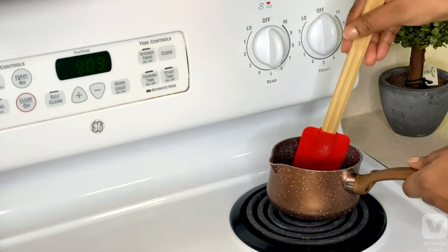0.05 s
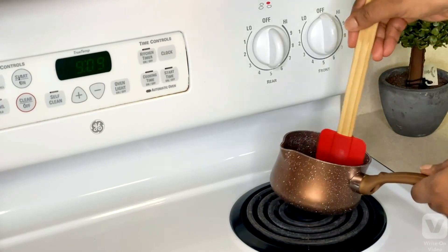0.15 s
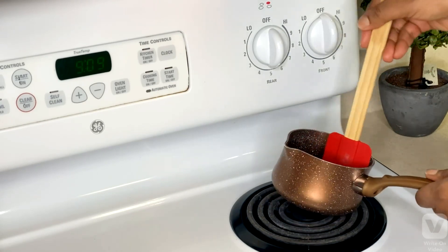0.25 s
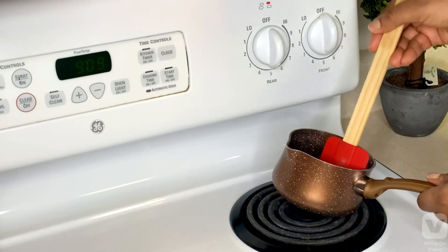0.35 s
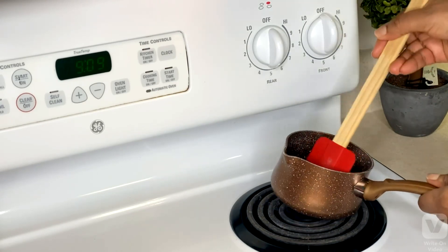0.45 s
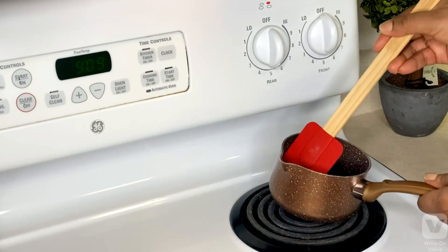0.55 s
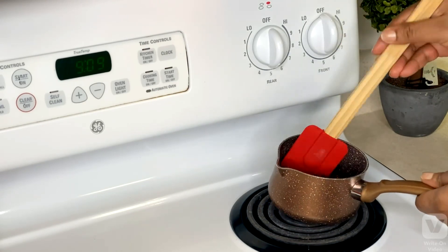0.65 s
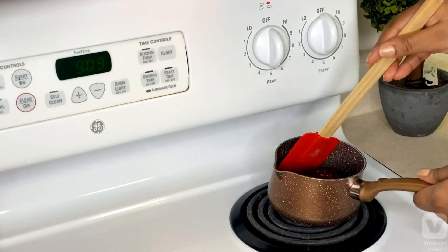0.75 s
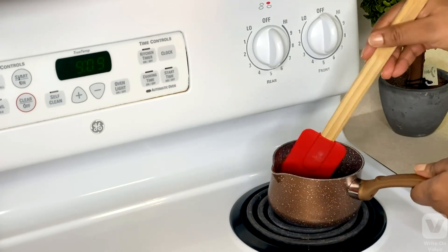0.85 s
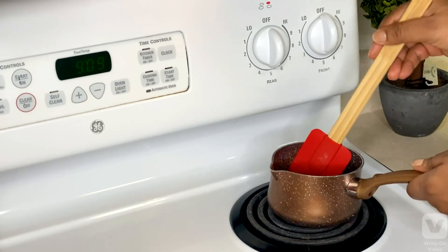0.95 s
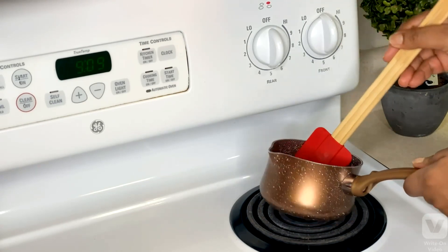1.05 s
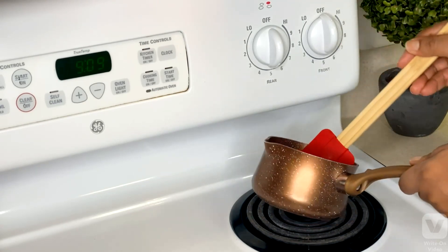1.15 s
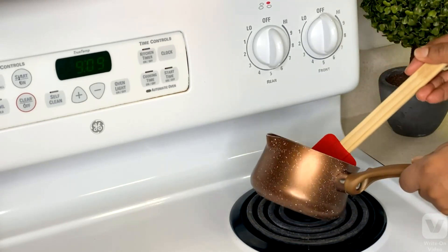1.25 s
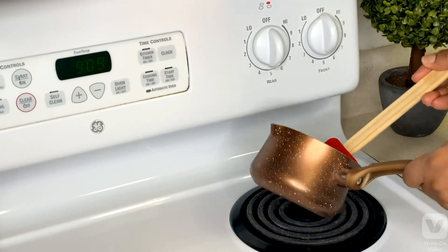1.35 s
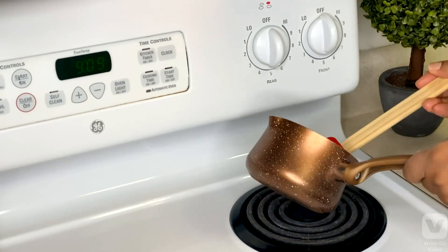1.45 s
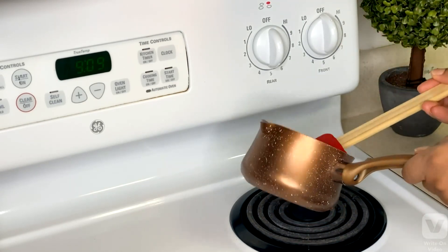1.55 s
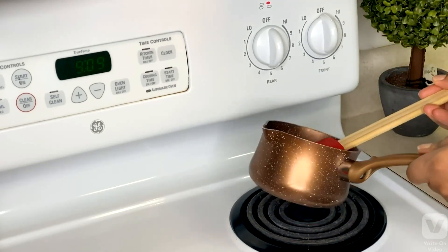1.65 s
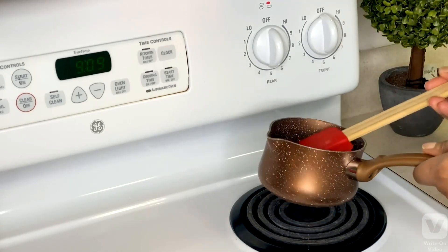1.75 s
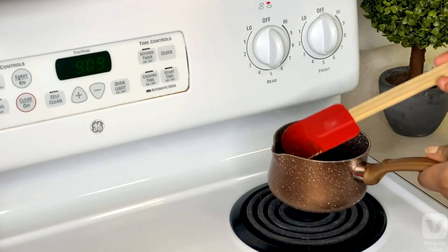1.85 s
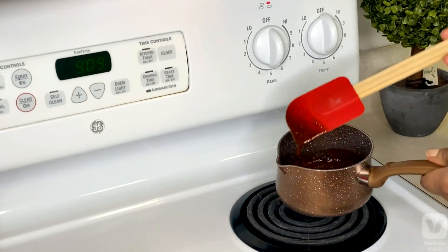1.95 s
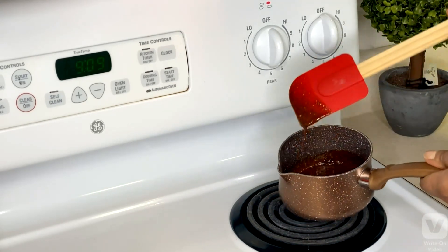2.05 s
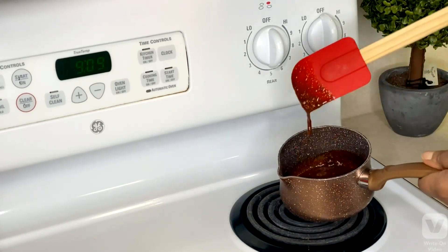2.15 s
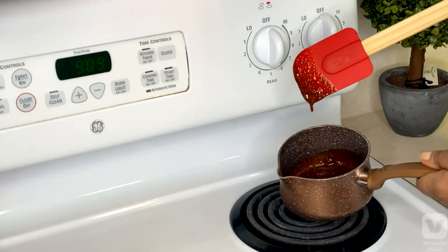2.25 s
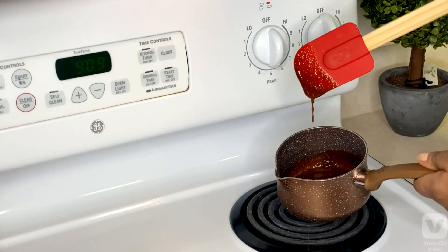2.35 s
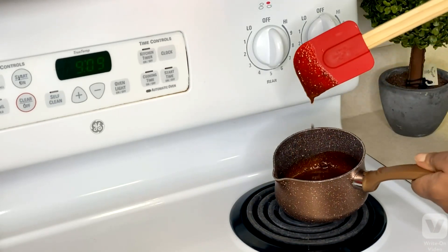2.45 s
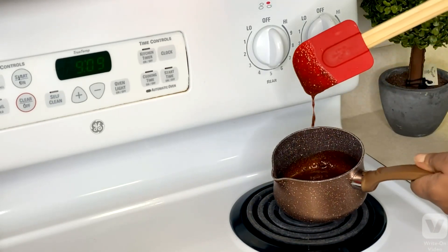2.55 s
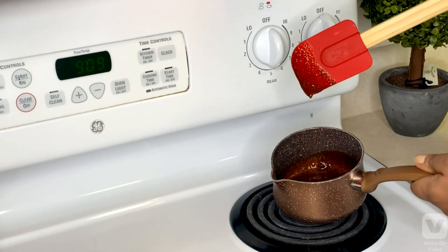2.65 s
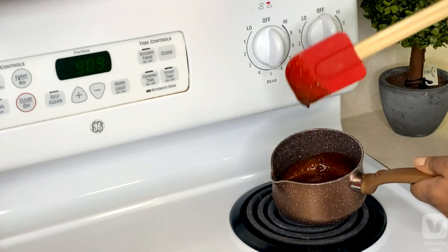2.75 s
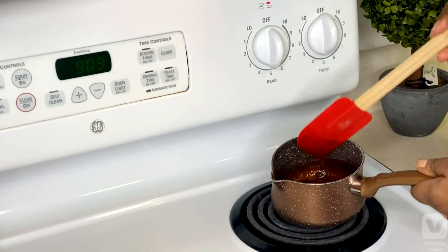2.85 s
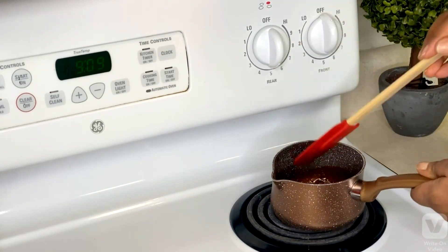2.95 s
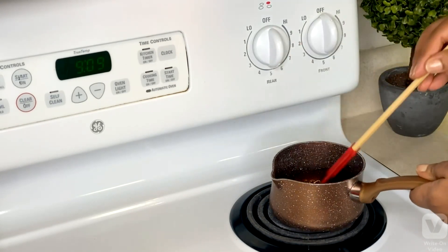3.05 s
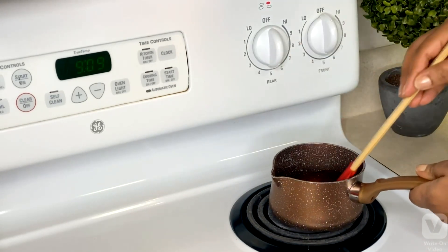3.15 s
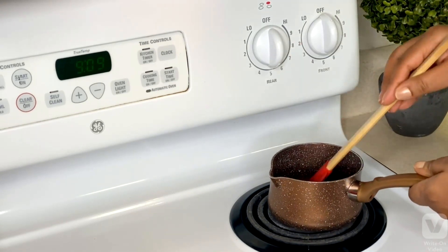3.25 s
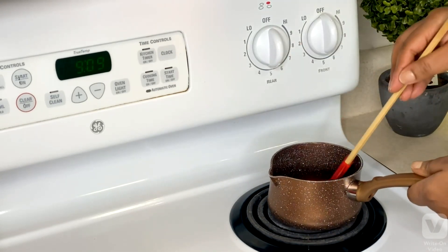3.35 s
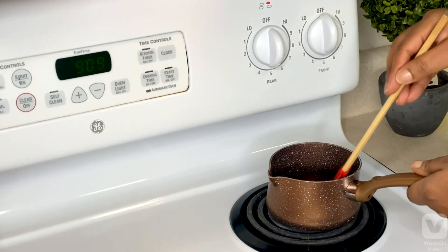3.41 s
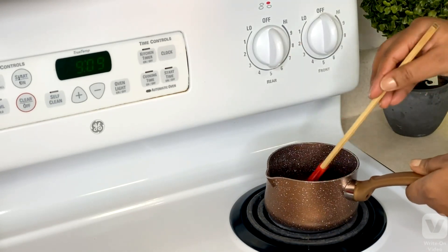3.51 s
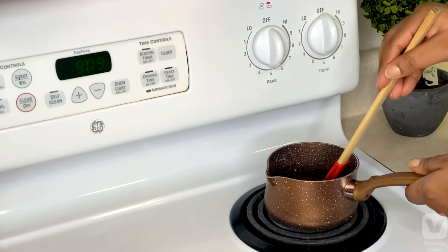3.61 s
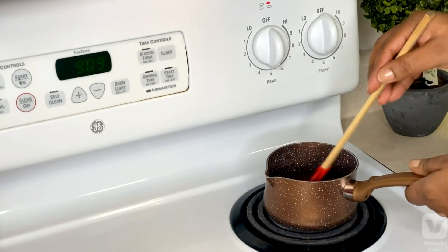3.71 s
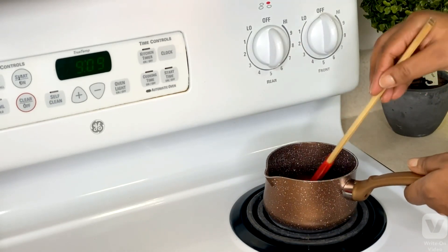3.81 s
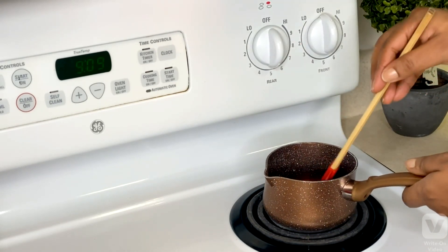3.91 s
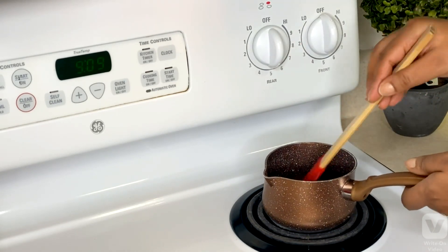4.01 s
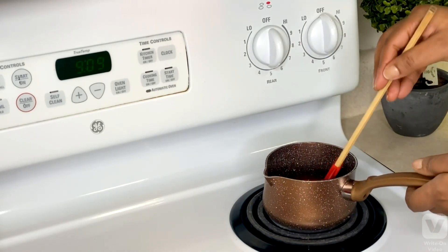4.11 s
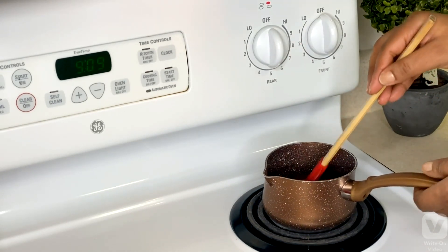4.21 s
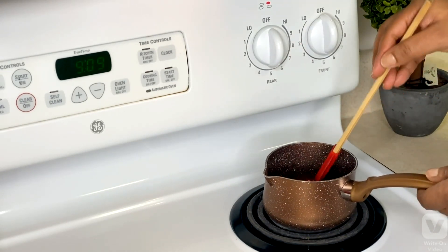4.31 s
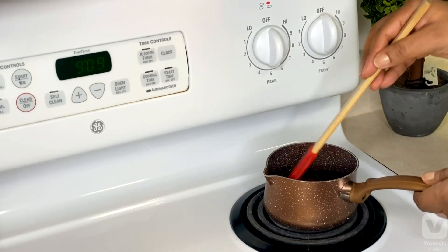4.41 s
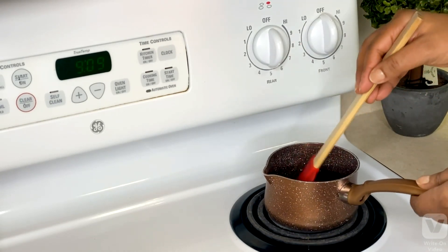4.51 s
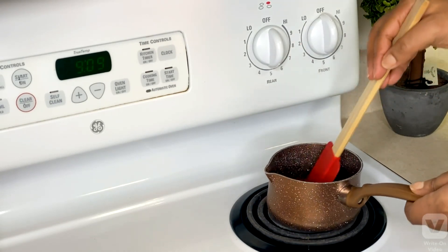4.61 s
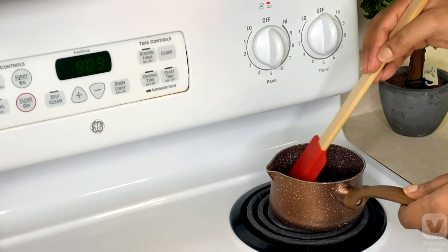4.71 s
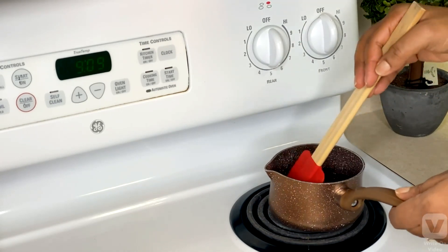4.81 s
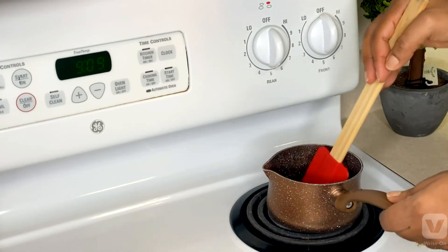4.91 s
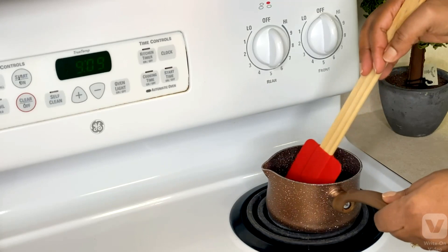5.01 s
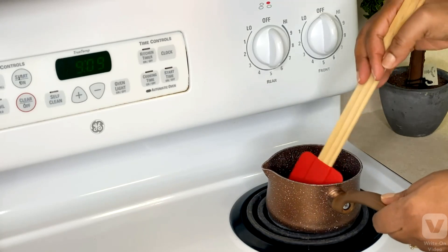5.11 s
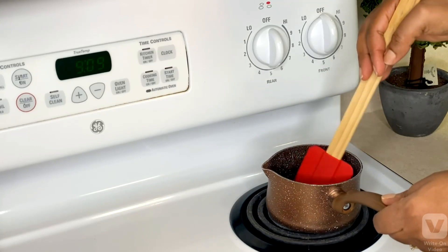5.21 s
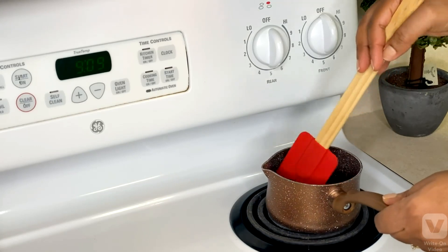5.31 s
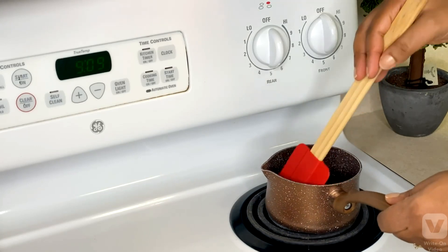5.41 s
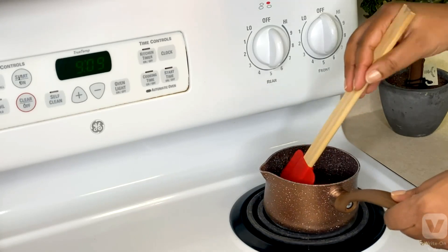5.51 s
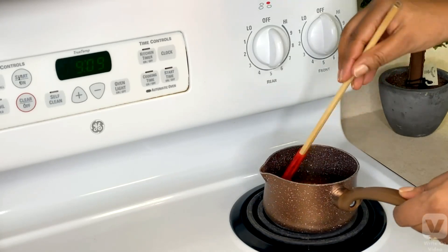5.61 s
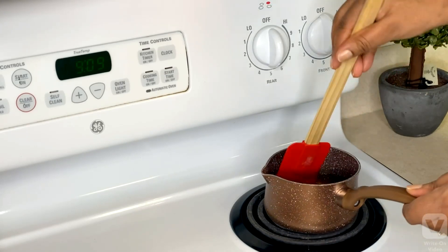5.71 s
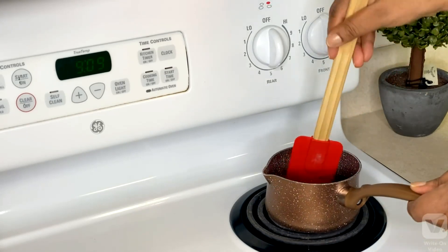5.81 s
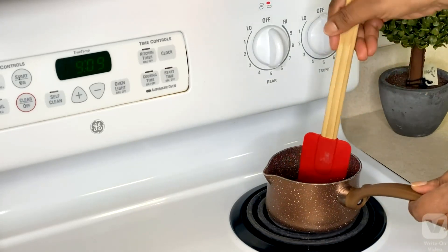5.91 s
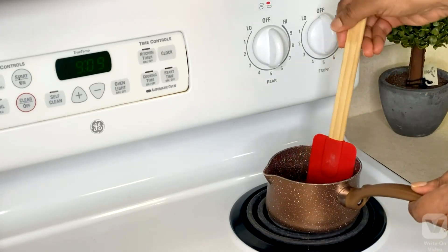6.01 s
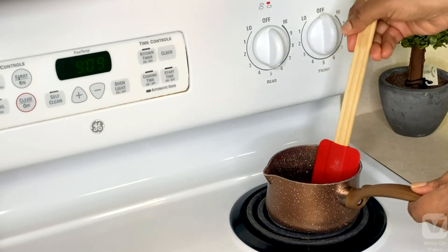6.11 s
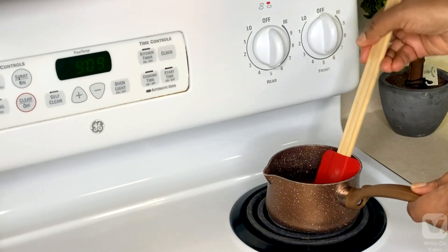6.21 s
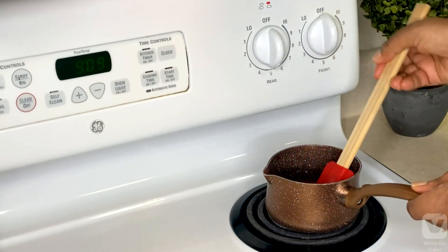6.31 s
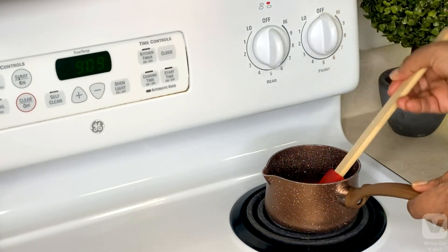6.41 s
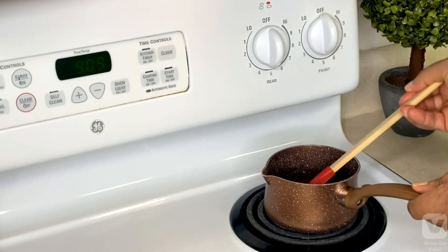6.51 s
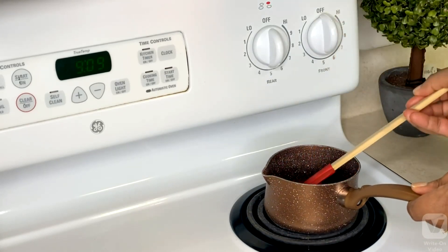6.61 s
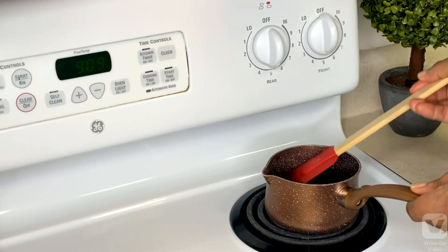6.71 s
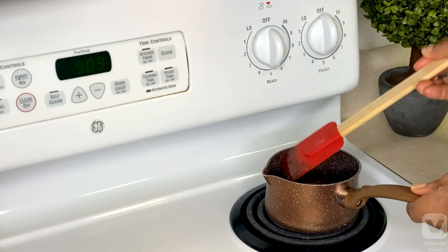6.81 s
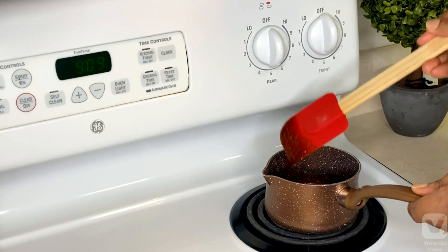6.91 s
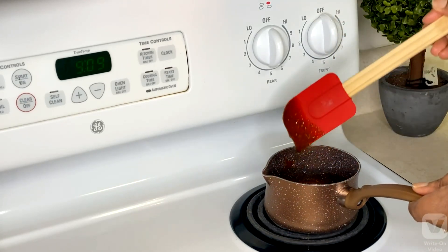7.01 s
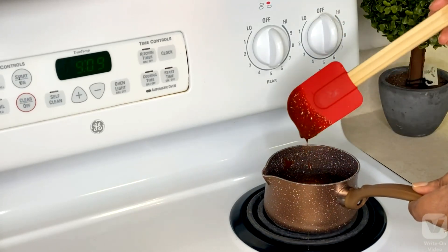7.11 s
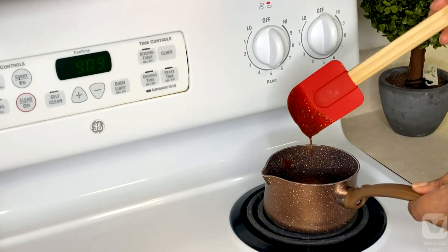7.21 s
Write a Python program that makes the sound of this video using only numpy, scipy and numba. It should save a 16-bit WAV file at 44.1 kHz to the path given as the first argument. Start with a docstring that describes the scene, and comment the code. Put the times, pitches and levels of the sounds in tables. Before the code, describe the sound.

A silicone spatula rubs through thick sauce in a small nonstick pan, making soft, gritty, wet strokes with a faint fizz and tiny snaps. The pan thuds once, low, against the burner. After a lull with faint drips, the stirring returns louder, with knocks on the pan wall, dull squelches and slight squeaks, then eases off. It sounds close, in a quiet kitchen with a low appliance hum.

```python
"""Stirring thick sauce

A silicone spatula rubs through sauce in a small nonstick pan held just above a stove: gritty, wet
strokes, each with an air pocket that rises in pitch as it closes. Sauce films fizz and snap, the blade
knocks on the pan, squelches and squeaks, and the tilted pan thuds once on the burner.
An appliance hums behind it all in the quiet kitchen."""
import sys
import numpy as np
from scipy import signal
from scipy.fft import rfft, irfft
from scipy.io import wavfile
from scipy.ndimage import uniform_filter1d
from numba import njit

SR = 44100
rng = np.random.default_rng(int(sys.argv[2]) if len(sys.argv) > 2 else 0)


def dump_mix(stems):
    """Bounce the given channels to the path in sys.argv[1] as a 16-bit WAV at rate SR."""
    frames = np.atleast_2d(stems).T  # one column per channel
    limited = np.clip(frames, -1, 1)  # hard clip at full scale
    pcm = np.round(limited * 32767).astype(np.int16)
    wavfile.write(sys.argv[1], SR, pcm)


N = 320166
TIME = np.arange(N) / SR


def undb(db):
    """Decibels to gain."""
    return 10 ** (np.asarray(db) / 20)


def unit(x):
    """Scale to rms 1."""
    return x / np.sqrt(np.mean(x ** 2) + 1e-30)


def steady(x):
    """Hold the rms at 1 over fifths of a second."""
    return x / np.sqrt(uniform_filter1d(x ** 2, size=SR // 5) + 1e-30)


def colour(x, points):
    """Equalise x along a curve of (frequency [Hz], gain [dB]) points."""
    hz, db = np.transpose(points)
    bins_hz = np.fft.rfftfreq(len(x), 1 / SR)
    curve_db = np.interp(np.log(bins_hz + 1), np.log(hz), db)
    return irfft(rfft(x) * undb(curve_db), len(x))


def registers(x):
    """Split into low, middle and treble."""
    edges = [(800, "low"), ([800, 3500], "band"), (3500, "high")]
    filters = [signal.butter(2, hz, kind, fs=SR, output="sos") for hz, kind in edges]
    return [signal.sosfilt(sos, signal.sosfilt(sos, x)) for sos in filters]


def fade(t, t60):
    """Exponential decay, 60 dB down after t60 seconds."""
    return np.exp(-np.log(1000) * t / t60)


def walk(rate_hz):
    """Smooth random wander with a spread near 1."""
    steps = rng.standard_normal(4096)
    return np.interp(TIME * rate_hz, np.arange(len(steps)), steps)


def add(out, start_s, x):
    """Mix x into out from start_s on."""
    i = max(int(start_s * SR), 0)
    out[i:i + len(x)] += x[:N - i]


@njit
def resonance(x, hz, width_hz):
    """State-variable band-pass whose centre can move with every sample."""
    y = np.empty(len(x))
    band_state, low_state = 0., 0.
    for i in range(len(x)):
        tuning = np.tan(np.pi * hz[i] / SR)
        damping = width_hz / hz[i]
        band = (band_state + tuning * (x[i] - low_state)) / (1 + tuning * (tuning + damping))
        band_state = 2 * band - band_state
        low_state += 2 * tuning * band
        y[i] = damping * band
    return y


def formant(x, hz, width_hz):
    """Two passes through a resonance that stays at one pitch."""
    centre = np.full(len(x), float(hz))
    return resonance(resonance(x, centre, float(width_hz)), centre, float(width_hz))


def grit(spread_db):
    """Dense tiny slips, a few much larger than the rest."""
    sizes = undb(spread_db * np.minimum(rng.exponential(size=N // 16 + 1), 5))
    return rng.standard_normal(N) * np.repeat(sizes, 16)[:N]


def strokes(swell_db=5, release_t60=0.33, pocket_rise=0.37, close_s=0.57):
    """Gains of drag, rub and fizz, and the air pocket's pitch and level, led by the hardest rub."""
    # blade strokes: (time [s], length [s], drag through sauce [dB], rub on the pan [dB],
    # wet fizz [dB], pocket's starting pitch [Hz], pocket level [dB])
    gestures = [(-.03, .1, -51.5, -52.5, -61, 1180, -1), (0.133, 0.075, -66, -57.5, -65, 1310, -3),
                (0.224, 0.11, -70.5, -67.5, -70.5, 1490, 12), (0.558, 0.047, -78, -73, -74, 1300, -8),
                (0.736, 0.11, -61, -63, -69, 1100, -15), (0.876, 0.042, -60, -68, -56.5, 1100, -18),
                (.96, 0.27, -77, -72, -73.5, 1300, -12), (1.306, 0.2, -79, -67, -72, 1380, 3),
                (1.48, 0.19, -82, -75.5, -76.5, 1310, -1), (3.058, .11, -61.5, -60, -55.5, 1360, 9),
                (3.156, 0.12, -55.5, -59, -70, 1080, -12), (3.286, 0.19, -66, -65.5, -58.5, 1610, 16.5),
                (3.488, 0.31, -74.5, -61.5, -62, 1200, 8), (3.735, .46, -68, -60, -66.5, 1180, 12),
                (4.357, 0.16, -52, -54.5, -67.5, 1010, 7.5), (4.507, 0.11, -55, -64.5, -82.5, 970, 11.5),
                (5.264, 0.49, -63, -69, -71, 1230, -8), (5.377, 0.09, -59, -60.5, -63, 1100, -5),
                (5.911, .49, -69.5, -61.5, -66, 1188, 16.5), (6.703, 0.052, -75, -73, -64, 1330, -7),
                (7.108, 0.22, -85, -79, -93, 1770, 25)]
    power, pocket, total_weight = 0, 0, 0
    for start, length, drag_db, rub_db, fizz_db, hz, pocket_db in gestures:
        t = np.maximum(TIME - start, 0)
        attack_s = 0.011 + 0.14 * length
        arch = np.sin(np.pi * np.minimum(t / length, 1))
        release = fade(np.maximum(t - length, 0), release_t60)
        effort = np.minimum(t / attack_s, 1) * undb(swell_db * (arch - 1.5)) * release
        power += (undb([[drag_db], [rub_db], [fizz_db]]) * effort) ** 2
        closed = np.sin(np.pi / 2 * np.minimum(t / close_s, 1)) ** 2
        weight = (undb(rub_db) * effort) ** 2 + 1e-18
        pocket += weight * np.array([hz * (1 + pocket_rise * closed), np.full(N, pocket_db)])
        total_weight += weight
    return np.sqrt(power), pocket / total_weight


def pan_ring(t, damping, scatter_db=3, detune=0.006):
    """The pan rings: each spot on the wall weights its modes anew, and shifting sauce detunes them."""
    # modes of the pan with its sauce: (frequency [Hz], level [dB], t60 before damping [s])
    pan_modes = [(197, -10, .3), (298, -12, .2), (397, -12, .24), (435, -10, .24), (503, -7, .25),
                 (595, -8, .2), (721, -4, .2), (938, -7, .18), (1060, -4, .23), (1189, -5, .24),
                 (1585, -6, .22), (1640, -6, .25), (1952, 2, .2), (2036, -4, .17), (2100, -6, .18),
                 (2612, -9, .15), (2961, -8, .22), (3322, -10, .22), (3783, -8, .18), (3968, -13, .2),
                 (4552, -15, .17), (4876, -16, .18), (5477, -14, .2), (6940, -12, .17), (7088, -10, .15),
                 (8060, -17, .17), (9462, -20, .18), (11110, -20, .15)]
    hz, db, t60 = np.transpose(pan_modes)[:, :, None]
    hz = hz * (1 + detune * rng.standard_normal(hz.shape))
    gains = undb(db + scatter_db * rng.standard_normal(hz.shape))
    partials = np.sin(2 * np.pi * (hz * t + rng.random(hz.shape)))
    return np.sum(gains * partials * fade(t, t60 / damping), axis=0)


def far_wall(x, path_s=0.0017, sway=0.23, echo_db=-5):
    """The pan's far wall echoes the rub; the path changes as the blade circles, so the colour shifts."""
    delay = path_s * np.exp(sway * walk(6))
    return x + undb(echo_db) * np.interp(TIME - delay, TIME, x)


def stirring(wall_db=-4, judder_db=2.32):
    """The blade drags, rubs and fizzes; the pocket of air behind it rises in pitch as it closes."""
    # spectrum of the rub: (frequency [Hz], gain [dB])
    rub_colour = [(120, -1), (280, 2.5), (500, -5.5), (1000, -1.5), (1700, -4.5), (2700, -5.5),
                  (4000, -7.5), (6000, -9.5), (7500, -11), (10000, -12), (11400, -26), (14500, -36)]
    # air pocket resonances: (multiple of its pitch [ratio], width [Hz], gain [dB])
    pocket_modes = [(1.001, 94.3, 1.5), (1.421, 166.5, -5), (1.78, 187, -2.5), (2.1, 200, -14),
                    (3.3, 400, -13)]
    gains, (pocket_hz, pocket_db) = strokes()
    slips = grit(spread_db=1.5)
    rub = unit(colour(slips, rub_colour))
    hollow = sum(undb(db) * resonance(rub, ratio * pocket_hz, float(width))
                 for ratio, width, db in pocket_modes)
    ring = pan_ring(TIME[:SR // 4], damping=3.2)  # the pressed blade damps the wall
    wall = unit(signal.fftconvolve(slips, ring)[:N])
    bands = registers(far_wall(rub + undb(wall_db) * wall) + undb(pocket_db) * hollow)
    judder = undb(judder_db * walk(70))  # silicone sticks and lets go
    return judder * sum(gain * steady(band) for gain, band in zip(gains, bands))


def film_fizz(flicker_db=0.7):
    """A thin film of sauce fizzes under the blade until the spatula is lifted out."""
    # spectrum of the fizz: (frequency [Hz], gain [dB])
    fizz_colour = [(1000, -31), (3000, -9.5), (5000, -4.5), (6800, 5.5), (8000, 3.5), (10500, 0.5),
                   (11800, -26), (15000, -30.5)]
    # envelope of the fizz: (time [s], level [dB])
    fizz_levels = [(0, -70), (.3, -74), (.42, -75), (.7, -75), (.86, -71), (1.77, -71), (1.85, -100)]
    fizz = unit(colour(grit(spread_db=2.2), fizz_colour))
    level_db = np.interp(TIME, *np.transpose(fizz_levels))
    return fizz * undb(level_db + flicker_db * walk(20))


def kitchen(air_db=-61, whine_hz=9216, whine_db=-96):
    """Low rumble, faint hiss, a wavering mains hum and an appliance's thin steady whine."""
    # spectrum of the room tone: (frequency [Hz], gain [dB])
    air_colour = [(12, -73.5), (20, -21), (54, -7), (76, -3.5), (124, -9.5), (147, -11), (211, -11),
                  (457, -23), (497, -26.5), (1110, -39), (1420, -41.5), (1730, -38.5), (3180, -47),
                  (9370, -49.5), (15000, -66.5)]
    # mains hum: (frequency [Hz], level [dB])
    hum_partials = [(60, -69), (120, -70)]
    air = unit(colour(rng.standard_normal(N), air_colour)) * undb(air_db + 0.63 * walk(4.6))
    hum = sum(undb(db + 2.3 * walk(6.8)) * np.sin(2 * np.pi * hz * TIME) for hz, db in hum_partials)
    whine = undb(whine_db) * np.sin(2 * np.pi * whine_hz * TIME)
    return air + np.sqrt(2) * (hum + whine)


def snap(hz, db, t60, ring_share=0.21, tear_s=0.0019):
    """A film of sauce tears: a spit of noise and a brief ring of the opened cavity."""
    t = TIME[:SR // 4]
    spit = unit(formant(rng.standard_normal(len(t)), hz, width_hz=hz))
    cavity = np.sqrt(2) * np.sin(2 * np.pi * hz * t)
    tear = np.sqrt(1 - ring_share) * spit + np.sqrt(ring_share) * cavity
    return undb(db) * tear * fade(t, t60) * np.minimum(t / tear_s, 1)


def snaps(drips=14, drip_span_s=(1.97, 2.39), drip_hz=4530):
    """Clear snaps of sauce film, and a scatter of faint ones as sauce drips from the lifted blade."""
    # tearing films: (time [s], pitch [Hz], level [dB], t60 [s])
    tears = [(.451, 5540, -52.5, 0.089), (1.164, 4120, -63.5, 0.068), (1.23, 2180, -64.5, 0.22),
             (1.436, 4910, -58, 0.1), (1.51, 2720, -72, .07), (1.579, 3900, -65.5, .07),
             (1.673, 2590, -66.5, 0.13), (1.772, 7100, -59, .04), (1.903, 1730, -68.5, 0.11),
             (2.029, 6300, -64.5, .055), (2.237, 3620, -70.5, 0.16), (4.297, 10100, -65, 0.023),
             (5.167, 8240, -44.5, 0.0065), (5.882, 7230, -69, 0.1), (7.173, 1830, -74.5, .3),
             (7.176, 4300, -66.5, 0.042)]
    out = np.zeros(N)
    for start, hz, db, t60 in tears:
        add(out, start, snap(hz, db, t60))
    for k, (jitter, pitch) in enumerate(rng.random((drips, 2))):
        start = np.interp(k + jitter, [0, drips], drip_span_s)
        hz = drip_hz * 2 ** (2 * pitch - 1)  # up to an octave either way
        add(out, start, snap(hz, db=-77.5, t60=0.12))
    return out


def blow(levels_db, attack_s, t60, cup_hz, ring_db, cup_db, crack_db=6.5, crack_s=0.015):
    """A clatter of blade and handle, a pop of cupped air and the pan's ring, damped by the sauce."""
    # spectrum of the clatter: (frequency [Hz], gain [dB])
    clatter_colour = [(20, -35), (50, 1.5), (100, 2.5), (200, 1), (330, -2.5), (500, 2.5), (800, 0),
                      (1000, 2.5), (1400, 0), (2000, 4), (2400, -2.5), (3600, -5.5), (5000, -12),
                      (7200, -11.5), (11000, -18), (15000, -44)]
    t = TIME[:SR // 2]
    head = slice(0, 1100)  # the first 25 ms set the balance
    decay_time = np.maximum(t - attack_s, 0)
    clatter = unit(colour(rng.standard_normal(len(t)), clatter_colour)) * fade(decay_time, t60)
    cup = formant(rng.standard_normal(len(t)), cup_hz, 0.72 * cup_hz) * fade(decay_time, t60=0.13)
    # the flatter the blade lands, the deeper the blow and the more air it cups
    depth_db = levels_db[0] - levels_db[1]
    cup = undb(cup_db + 2.65 * depth_db) * cup / np.std(cup[head])
    ring = pan_ring(t, damping=1.3)
    low, middle, treble = registers(clatter + cup + undb(ring_db) * ring / np.std(ring[head]))
    treble *= undb(crack_db * np.exp(-decay_time / crack_s))  # brightest at first contact
    hit = sum(undb(db) * band / np.std(band[head]) for db, band in zip(levels_db, (low, middle, treble)))
    return hit * np.minimum(t / attack_s, 1) ** 0.74


def knocks():
    """The blade lands hard on the pan's wall or floor."""
    # spatula hits: (time [s], low thud [dB], middle knock [dB], treble click [dB], attack [s],
    # clatter t60 [s], cupped air pitch [Hz])
    hits = [(.66, -63, -60, -71, 0.0034, 0.49, 2100), (1.284, -54, -55, -58.5, 0.0022, 0.21, 1610),
            (2.85, -48, -41, -49, 0.0023, 0.29, 614), (3.036, -56, -54, -55.5, 0.00055, 0.48, 1120),
            (3.334, -54, -53.5, -67, .002, 0.28, 570), (3.584, -43.5, -41.5, -42.5, .0007, 0.34, 730),
            (3.826, -42.5, -35.5, -41, 0.0045, 0.38, 695), (4.057, -40.5, -35, -37, 0.0097, 0.25, 1500),
            (4.712, -38, -39, -38, .0005, 0.31, 470), (4.987, -44, -41.5, -43, 0.013, 0.34, 1120),
            (5.309, -60, -62.5, -66.5, .0015, .15, 505), (6.648, -58, -52, -69.5, 0.0046, 0.25, 1850)]
    out = np.zeros(N)
    for start, *levels_db, attack_s, t60, cup_hz in hits:
        add(out, start, blow(levels_db, attack_s, t60, cup_hz, ring_db=-0.5, cup_db=-0.5))
    return out


def squelches(gain_db=1, cushion_hz=2570):
    """The blade shoves the sauce or pulls free: cushioned blows, slow to swell, dull and short."""
    # shoves and pulls: (time [s], relative level [dB], swell [s], cupped air pitch [Hz])
    shoves = [(.811, -54, 0.0033, 1270), (.87, -44, 0.027, 760), (3.699, -52, 0.0063, 1130),
              (3.942, -49, 0.0052, 1060), (4.156, -55, 0.0082, 1040), (4.378, -55, 0.0055, 910),
              (4.792, -49, 0.054, 1150), (5.057, -42.5, 0.017, 1080), (5.61, -56, 0.029, 1030),
              (6.469, -57, 0.025, 764)]
    out = np.zeros(N)
    for start, db, swell_s, cup_hz in shoves:
        levels_db = (db - 3.5, db, db - 9)  # low, middle, treble
        add(out, start, blow(levels_db, swell_s, t60=0.19, cup_hz=cup_hz, ring_db=-3.5, cup_db=6))
    cushion = signal.butter(1, cushion_hz, fs=SR, output="sos")
    return undb(gain_db) * signal.sosfilt(cushion, out)


def burner_thud(start_s=1.292, rise_s=0.031):
    """The tilted pan leans on the burner, which wobbles low."""
    # modes of the rocking burner: (frequency [Hz], level [dB], t60 [s])
    burner_modes = [(49, -46, 0.59), (70.8, -39, 0.41), (88.4, -39, 0.38), (129, -52, 0.22)]
    out, t = np.zeros(N), TIME[:SR // 2]
    wobble = sum(undb(db) * np.sin(2 * np.pi * hz * t) * fade(t, t60) for hz, db, t60 in burner_modes)
    add(out, start_s, wobble * np.minimum(t / rise_s, 1))
    return out


def squeaks():
    """Wet silicone chatters over the coating in narrow resonances, swelling and dying with each slide."""
    # squeaking slides: (time [s], length [s], level [dB])
    slides = [(4.345, .05, -73), (5.26, .1, -68), (5.36, .08, -69), (5.66, .09, -66), (6.705, .08, -71)]
    # resonances of the blade's edge: (frequency [Hz], half-width of each filter pass [Hz], level [dB])
    edge_modes = [(2620, 110, -4), (5270, 110, -3), (7580, 260, 0), (9510, 150, -9)]
    out = np.zeros(N)
    for start, length, db in slides:
        slips = rng.standard_normal(SR // 4)[:int(length * SR)]
        edge = sum(undb(mode_db) * unit(formant(slips, hz, 2 * half_width))
                   for hz, half_width, mode_db in edge_modes)
        swell = np.sqrt(np.hanning(len(slips)))
        add(out, start, undb(db) * unit(edge) * swell)
    return out


def room(x, wet_db=-9, band_t60s=(0.35, 0.21, 0.21), build_s=0.019):
    """Stove panel and kitchen walls return a short diffuse tail, longest in the lows."""
    t = TIME[:SR * 3 // 4]
    bands = registers(rng.standard_normal(len(t)))
    tail = sum(band * fade(t, t60) for band, t60 in zip(bands, band_t60s))
    tail *= 1 - np.exp(-t / build_s)
    return x + undb(wet_db) * signal.fftconvolve(x, tail / np.linalg.norm(tail))[:N]


def scene():
    """Spatula and sauce sound into the room, over the dry burner thud and the kitchen's hum."""
    pan = stirring() + film_fizz() + knocks() + squelches() + squeaks() + snaps()
    return (room(pan) + burner_thud() + kitchen())[None]


def record(dry, low_cut_hz=34, top_hz=15400):
    """The microphone sheds the deepest bass, its port notches the treble, and the top is cut."""
    # notches of the microphone port: (frequency [Hz], width [Hz])
    port_notches = [(8520, 750), (12150, 1400)]
    x = signal.sosfilt(signal.butter(2, low_cut_hz, "high", fs=SR, output="sos"), dry)
    for hz, width in port_notches:
        x = signal.lfilter(*signal.iirnotch(hz, hz / width, fs=SR), x)
    return signal.sosfilt(signal.ellip(8, 0.2, 70, top_hz, fs=SR, output="sos"), x)


dry = scene()
out = record(dry)
dump_mix(out)
```